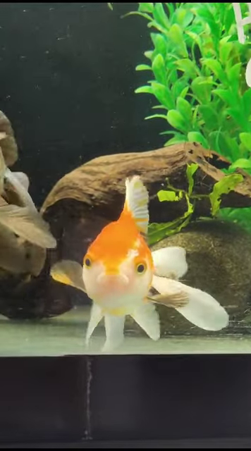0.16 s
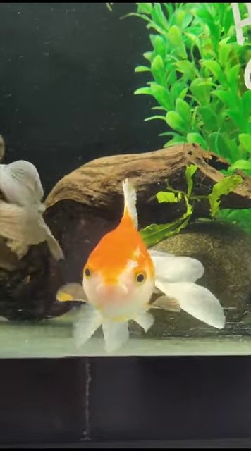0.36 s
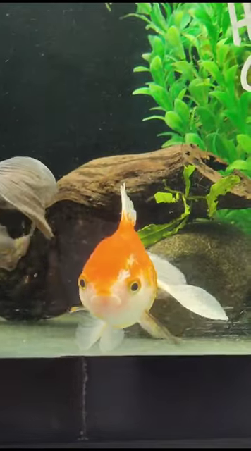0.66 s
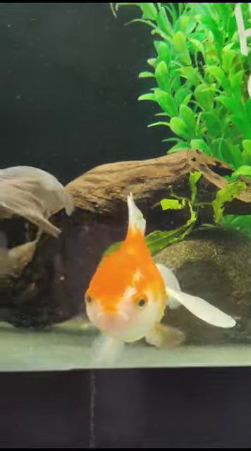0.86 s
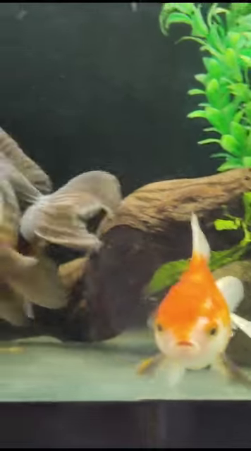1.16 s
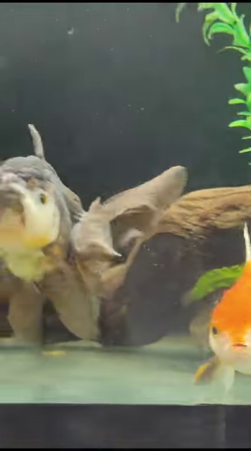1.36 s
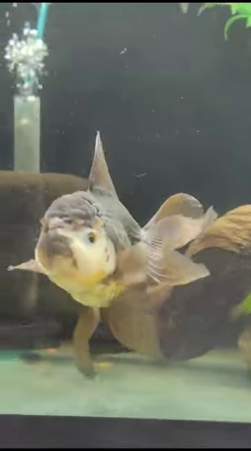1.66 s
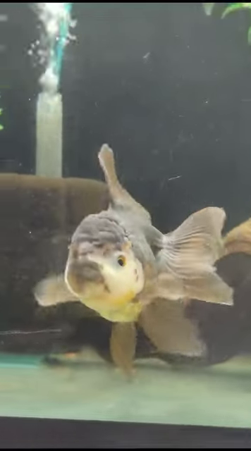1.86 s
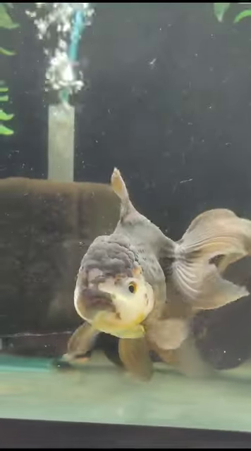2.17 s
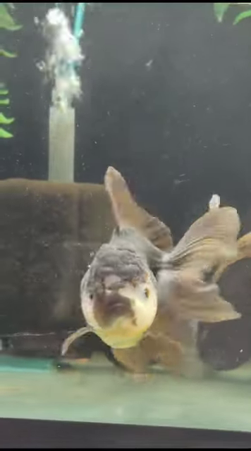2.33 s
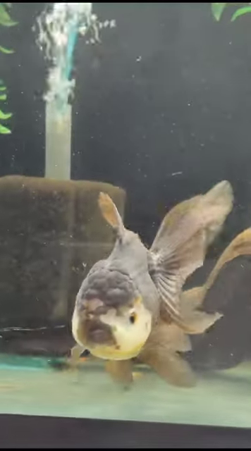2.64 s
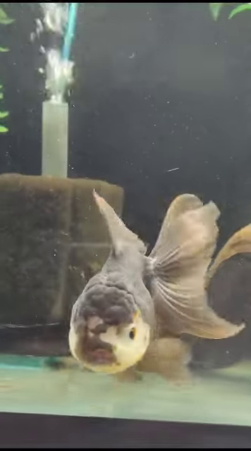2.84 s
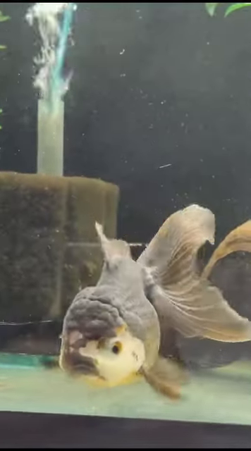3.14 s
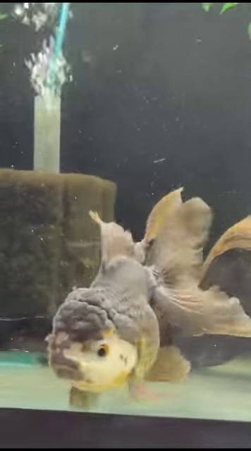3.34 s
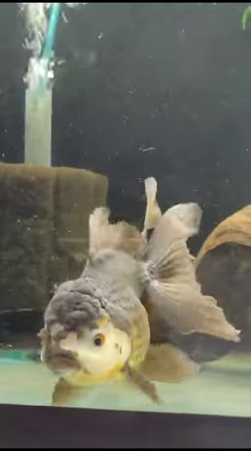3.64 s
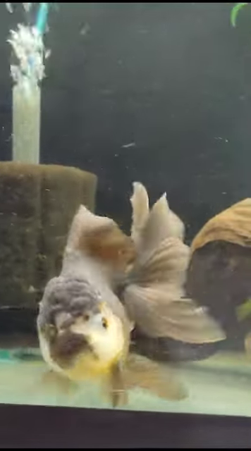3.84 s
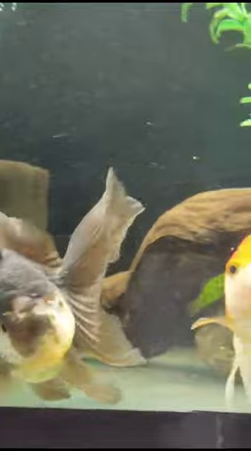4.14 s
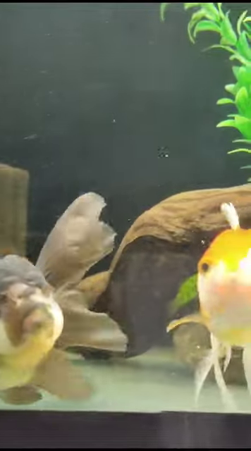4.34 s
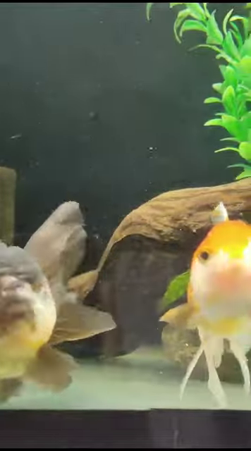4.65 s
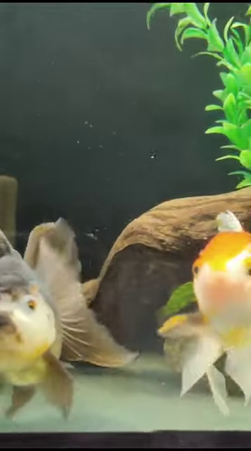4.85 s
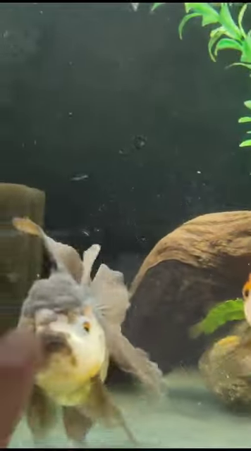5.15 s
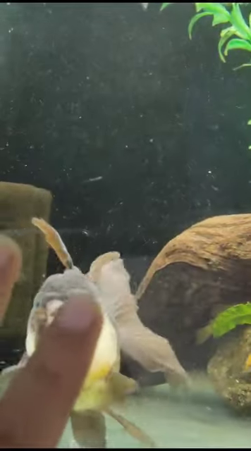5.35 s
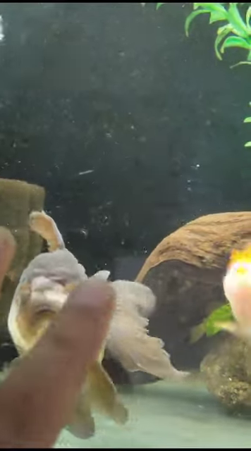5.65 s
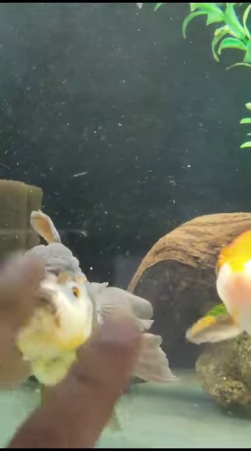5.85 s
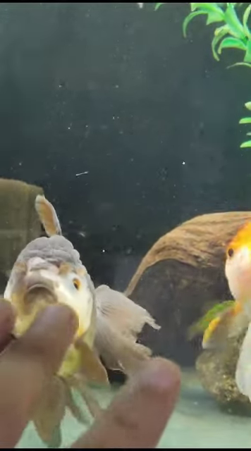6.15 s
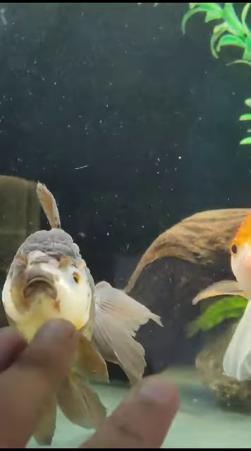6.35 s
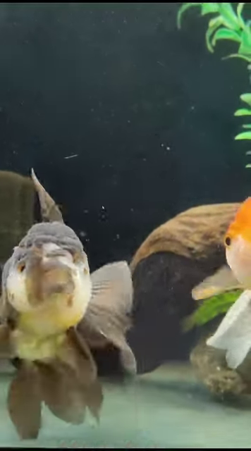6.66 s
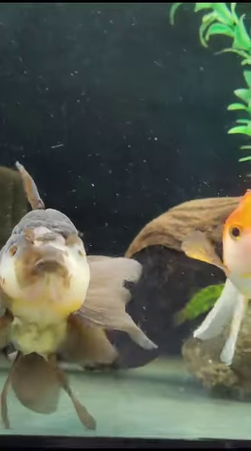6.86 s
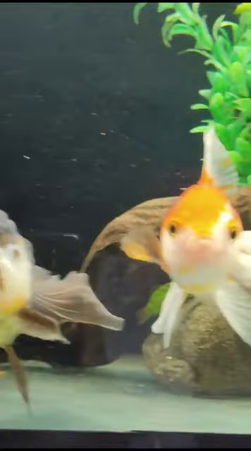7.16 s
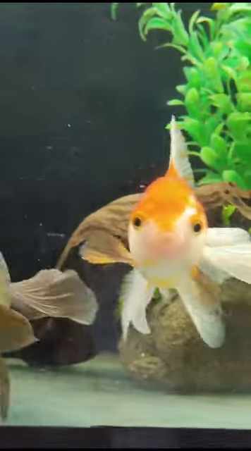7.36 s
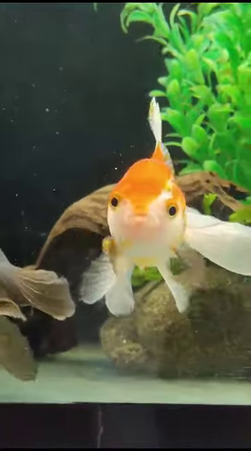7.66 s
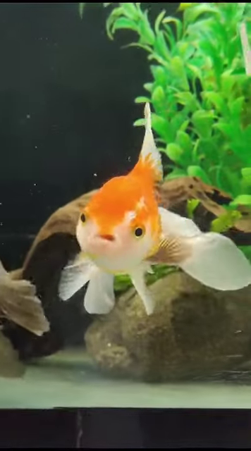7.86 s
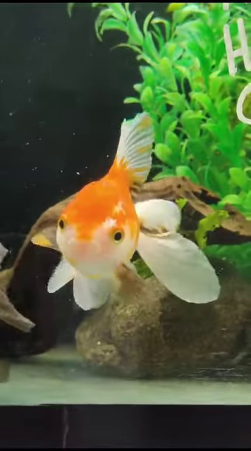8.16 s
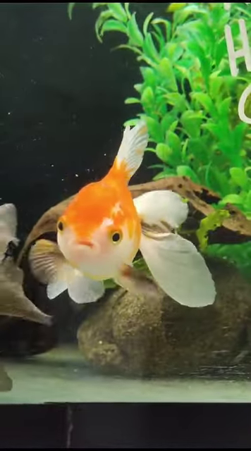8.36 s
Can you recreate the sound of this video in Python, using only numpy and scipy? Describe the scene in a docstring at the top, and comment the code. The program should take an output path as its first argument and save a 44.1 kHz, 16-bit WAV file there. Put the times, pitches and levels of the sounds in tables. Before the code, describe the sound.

An aquarium filter gurgles steadily with dense low bubbling over a soft watery rush and hum, while a thin motor whine fades and returns.

```python
"""A home aquarium in a small room, from a hand-held microphone drifting along the front glass.
Throughout, air gurgles from a sponge filter's lift tube (ringing bubbles) over a rush (shaped noise) and hum.
A motor whine (sines locked to one shaft) sinks into quiet zones of the room at about 1.5-2.9 s and 5.2-6.4 s.
Thin, high squeaks (gliding sines) come near 2.1 s and 3.7 s; the gurgle slackens near 3.55 s and 7.98 s.
Two faint ticks (noise bursts) come close to the end, after 8.4 s."""
import sys
import numpy as np
from scipy import signal
from scipy.fft import rfft, irfft
from scipy.io import wavfile
from scipy.ndimage import uniform_filter1d

SR = 44100
rng = np.random.default_rng(int(sys.argv[2]) if len(sys.argv) > 2 else 0)


def log_audio(samples):
    """Write samples as a 16-bit WAV file to the path given in sys.argv[1]."""
    # one column per channel
    frames = np.atleast_2d(samples).T
    # limit to full scale, then quantise
    limited = np.clip(frames, -1, 1)
    pcm = np.round(limited * 32767).astype(np.int16)
    wavfile.write(sys.argv[1], SR, pcm)


N = 374850  # length of the scene in samples


def amp(db):
    """Decibels to gain."""
    return 10 ** (np.asarray(db) / 20)


def unit(x):
    """Scales to rms 1."""
    return x / np.sqrt(np.mean(x ** 2) + 1e-20)


def curve(rows, t, axis=1):
    """One column of a time table, joined by straight lines, at the times t."""
    rows = np.asarray(rows)
    return np.interp(t, rows[:, 0], rows[:, axis])


def colour(points, hz):
    """A spectrum in dB, joined on a log-frequency axis."""
    f, db = np.transpose(points)
    return np.interp(np.log(hz + 1), np.log(f), db)


def drift(rate_hz):
    """Random wander of rms 1, its spectrum falling away smoothly around the given rate."""
    hz = np.fft.rfftfreq(N, 1 / SR)
    spectrum = rfft(rng.standard_normal(N)) * np.exp(-(hz / rate_hz) ** 2)
    return unit(irfft(spectrum, N))


def patches(shape, size):
    """A smooth random field of rms 1 over frames and frequency bins."""
    field = rng.standard_normal(shape)
    for axis in (0, 1, 0, 1):
        field = uniform_filter1d(field, size[axis], axis, mode="wrap")
    return unit(field)


def add(mix, start_s, sound):
    """Mixes a sound in at its start time."""
    part = mix[max(round(start_s * SR), 0):][:len(sound)]
    part += sound[:len(part)]


def room(x, t60, wet_db):
    """Direct sound plus a short tail of sparse reflections that falls 60 dB in t60 seconds."""
    t = np.arange(SR // 2) / SR
    signs = rng.choice([-1, 1], len(t))
    present = rng.random(len(t)) < 1 / 20
    taps = signs * present * (t > .004) * amp(-60 * t / t60)
    tail = signal.fftconvolve(x, taps / np.linalg.norm(taps))[:N]
    return x + amp(wet_db) * tail


def bubble(hz, cycles, rise):
    """A pocket of air rings, its pitch climbing as it nears the surface."""
    age = np.arange(SR // 6) / SR * hz / cycles  # in decay times, each lasting the given cycles
    turns = cycles * (age + rise * (age - 1 + np.exp(-age)))
    ring = np.sin(2 * np.pi * turns) * np.exp(-age) * (1 - np.exp(-age * cycles))
    return ring / abs(ring).max()


def births(per_s, spread_db):
    """Impulses at random moments, each with a random strength."""
    moments = rng.random(N) < per_s / SR
    return moments * amp(spread_db * np.minimum(rng.exponential(1, N), 2))


# Colour of the gurgle through the tank wall: (frequency [Hz], relative level [dB])
WALL_COLOUR = [(60, -43), (90, -25.5), (115, -13), (150, -9), (190, -2), (280, 8.5), (355, 7.5), (430, -4),
               (530, -9), (680, -18.5), (1000, -20.5), (1800, -49)]
# Deepest bubbles, faintest near 3.55 s, before trim and surges: (time [s], level [dB])
DEEP_LEVEL = [(0, -52), (0.35, -45), (0.48, -52), (0.68, -51), (0.8, -44.5), (2.4, -45.5), (3.4, -44),
              (3.47, -56), (3.55, -61), (3.61, -49), (3.68, -51), (3.85, -44.5), (4.4, -45.5), (5.3, -43.5),
              (6, -45), (6.6, -44.5), (7.3, -45.5), (8.3, -45.5), (8.5, -50)]
# Small bubbles, in the gurgle and at the surface, before trims and surges: (time [s], level [dB])
SMALL_LEVEL = [(0, -50), (0.65, -47), (1.2, -50.5), (1.6, -49), (3.4, -48.5), (4.4, -50.5), (4.8, -53.5),
               (5.3, -49.5), (7.1, -48), (7.6, -49), (7.9, -49), (8.5, -48.5)]
SURGE_HZ, SURGE_DB = 28, 2  # the air comes in uneven surges
DEEP_SURGE_DB, SMALL_SURGE_DB = 1.7, 1.5


def gurgle(t, per_s=900, cycles=2.81, rise=0.18, spread_db=2.5, level_db=-6.5, deep_db=0.0,
           small_db=-1.0, deep_hz=228, small_hz=430, count=48):
    """A dense crowd of bubbles of all sizes; the small ones come more rarely."""
    crowd = np.zeros(N)
    for hz in np.geomspace(110, 1000, count):
        starts = births(per_s / count * min(1, 350 / hz), spread_db)
        crowd += signal.oaconvolve(starts, bubble(hz, cycles * np.sqrt(hz / 250), rise))[:N]
    hz = np.fft.rfftfreq(N, 1 / SR)
    spectrum = rfft(room(crowd, t60=0.33, wet_db=-2.5))
    # evened out over pitch, then coloured by the tank wall
    spectrum /= np.sqrt(abs(uniform_filter1d(abs(spectrum) ** 2, size=250)) + 1e-6)
    spectrum *= amp(colour(WALL_COLOUR, hz)) / (1 + (hz / 2500) ** 4)
    # three bands for three bubble sizes, each with its own level
    deep = 1 / (1 + (hz / deep_hz) ** 10)
    small = 1 - 1 / (1 + (hz / small_hz) ** 10)
    middle = 1 - deep - small
    deep_level = curve(DEEP_LEVEL, t) + deep_db + DEEP_SURGE_DB * drift(SURGE_HZ)
    middle_level = airflow(t) + level_db
    small_level = curve(SMALL_LEVEL, t) + small_db + SMALL_SURGE_DB * drift(SURGE_HZ)
    sizes = [(deep, deep_level), (middle, middle_level), (small, small_level)]
    return sum(amp(db) * metered(irfft(spectrum * share, N)) for share, db in sizes)


# Middle-sized bubbles, a little weaker towards the end, before trim: (time [s], level [dB])
AIRFLOW_LEVEL = [(0, -37), (1.5, -40.5), (4.6, -38), (5.4, -38.5), (6.8, -39.5), (7.5, -43.5), (8.5, -41.5)]
# Brief slackenings of the flow: (time [s], half length [s], dip [dB])
FLOW_LULLS = [(3.553, 0.046, 13), (7.984, 0.07, 23)]


def airflow(t):
    """Strength of the middle-sized bubbles in dB: random surges, broken by lulls."""
    dips = sum(dip_db * np.exp(-((t - s) / half_length) ** 2) for s, half_length, dip_db in FLOW_LULLS)
    return curve(AIRFLOW_LEVEL, t) + SURGE_DB * drift(SURGE_HZ) - dips


def metered(x):
    """The pump meters out the air, so the bubbles' short-term power stays nearly even."""
    x = unit(x)
    return x / np.sqrt(abs(uniform_filter1d(x ** 2, size=5000)) + 0.039)


# Single bubbles leaving the tube, large and small, before trim and room:
# (time [s], peak [dB], starting pitch [Hz], swell time constant [s], pitch climb [octaves/s])
SINGLE_GULPS = [(0.033, -38, 393, 0.016, 17.5), (0.058, -49, 650, 0.015, 6), (0.082, -37, 357, 0.013, 15),
                (0.278, -27, 300, 0.012, 10.5), (0.288, -46.0, 730, 0.017, 14.5),
                (0.304, -36.0, 327.5, 0.036, 2), (0.381, -44, 358, 0.014, 17.5),
                (0.438, -47, 397, 0.017, 13.5), (0.47, -37.5, 330, 0.017, 2), (0.79, -37, 172, 0.019, 4),
                (0.795, -35, 332, 0.018, 4), (0.973, -46, 506, 0.036, 3.5), (1.003, -29, 328, 0.012, -5),
                (1.25, -46, 515, 0.016, 5.5), (1.336, -33.5, 285.6, 0.034, 5),
                (1.395, -29.5, 272, 0.0081, 9), (1.53, -31.5, 300, 0.013, 21),
                (1.569, -33.5, 278, 0.015, 11.5), (1.571, -43, 660, 0.015, 3.5),
                (1.572, -42.5, 589, 0.027, 0), (1.766, -45, 766, 0.01, -1), (1.782, -32.5, 298, 0.033, 8),
                (1.846, -42, 564, 0.013, 14), (1.908, -46, 756, 0.0083, 10),
                (2.207, -33.0, 345, 0.03, -0.5), (2.318, -36.5, 188, 0.018, 2),
                (2.332, -44, 358, 0.028, 10.5), (2.376, -37, 192, 0.02, -2), (2.485, -34, 340, 0.012, 4),
                (2.612, -33.5, 325, 0.018, 4.5), (2.7, -47.5, 550, 0.043, 4), (2.703, -33, 277, 0.041, 5),
                (2.803, -35.5, 277, 0.018, 1), (2.999, -39.0, 520, 0.015, 11.5),
                (3.109, -39, 268, 0.041, 5), (3.138, -37.5, 420, 0.018, 16), (3.172, -44, 630, 0.009, 8),
                (3.209, -32.5, 297, 0.013, 16), (3.261, -45, 349, 0.024, 7.5), (3.318, -46, 488, 0.013, 4),
                (3.406, -37, 312, 0.017, -0.5), (3.434, -42.5, 507, 0.02, 2),
                (3.507, -39.5, 362.6, 0.02, 6), (3.695, -34.5, 304, 0.02, 3), (3.746, -34, 345, 0.036, 0.5),
                (3.844, -34, 275, 0.029, -0.5), (3.99, -33.5, 240, 0.033, -0.5),
                (4.235, -36.5, 497, 0.016, 3), (4.293, -44.5, 383.5, 0.055, 6),
                (4.308, -42.5, 424, 0.018, 2.5), (4.49, -35, 254, 0.021, 4),
                (4.634, -32, 292.7, 0.029, 3.5), (5.07, -35.5, 293, 0.012, -1),
                (5.208, -35.5, 328, 0.024, 9.5), (5.243, -38, 177, 0.022, 1.5), (5.267, -40, 589, 0.009, 2),
                (5.289, -42.0, 444, 0.018, 18), (5.298, -34, 222.6, 0.047, -1), (5.306, -35, 339, 0.017, 6),
                (5.372, -33.5, 296, 0.024, 10), (5.403, -41, 484, 0.023, 3.5),
                (5.607, -29.5, 264, 0.0067, -3), (5.633, -47, 571, 0.03, 3), (5.67, -31.5, 291, 0.013, 3.5),
                (5.76, -34, 342, 0.017, 2.5), (5.854, -36, 428, 0.0078, 14), (6.009, -38, 523, 0.015, -0.5),
                (6.13, -32.5, 347, 0.011, 3), (6.283, -29.5, 206, 0.0064, 8), (6.305, -38, 485, 0.018, 7),
                (6.309, -44, 392, 0.027, 10.5), (6.32, -46, 573, 0.02, 6), (6.43, -41, 482, 0.03, -1),
                (6.545, -35.5, 355, 0.015, 0), (6.634, -30.5, 204, 0.0073, -1.5),
                (6.766, -32.5, 259, 0.027, 10.5), (6.926, -34, 283, 0.031, 0.5),
                (7.066, -42, 684, 0.009, 11), (7.092, -30.5, 210, 0.02, 5), (7.213, -46.0, 635, 0.017, 11),
                (7.367, -37.5, 413, 0.022, 15.5), (7.494, -45, 508, 0.033, 4),
                (7.733, -33, 321, 0.013, 4.5), (7.802, -38, 252, 0.021, 4), (7.824, -37.5, 377, 0.023, 4.5),
                (8.215, -40.5, 476, 0.022, 8), (8.226, -38, 608, 0.011, -2), (8.421, -43, 647, 0.02, 15.5)]


def gulps(level_db=-1.0):
    """Single bubbles, large and small, over the gurgle, with a little of the room."""
    out = np.zeros(N)
    for s, db, hz, swell_s, climb in SINGLE_GULPS:
        add(out, s, amp(db + level_db) * gliding_tone(hz, swell_s, climb))
    return room(out, t60=0.26, wet_db=-11)


def gliding_tone(hz, swell_s, octaves_per_s):
    """A sine swells and rings out while its pitch glides, as when a bubble pinches off."""
    t = np.arange(0, 5 * swell_s, 1 / SR)
    age = t / swell_s
    ring = age * np.exp(-age - (age / 2) ** 2)
    turns = np.cumsum(hz * 2 ** (octaves_per_s * t)) / SR
    return ring / ring.max() * np.sin(2 * np.pi * turns)


SHAFT_HZ, WHINE_ORDER = 58.162, 40  # shaft turns per second; whine as a multiple of them
# Whine at the microphone, through two quiet zones, before trim and flutter: (time [s], level [dB])
WHINE_LEVEL = [(0, -36), (1.18, -34.5), (1.42, -38), (1.52, -49), (2.05, -52), (2.82, -50), (2.96, -41),
               (3.1, -46), (3.27, -41.5), (4.25, -35), (4.66, -35), (5.02, -41.5), (5.26, -61.5),
               (5.62, -56), (5.76, -51), (6.1, -51), (6.23, -57), (6.4, -49.5), (6.98, -40), (7.22, -38),
               (7.45, -35), (8.5, -35)]
# Its octave, with standing waves of its own, before trim: (time [s], level [dB])
OCTAVE_LEVEL = [(0, -81), (1.45, -83), (1.62, -63), (1.8, -60), (2.7, -60), (2.88, -65.5), (3.6, -66.5),
                (3.92, -85), (4.12, -64.5), (4.4, -59), (4.73, -58.5), (4.85, -67.5), (5.75, -65.5),
                (6.35, -69), (6.85, -67), (7.2, -58), (7.8, -55), (8.5, -57)]
# Side tone one shaft order above the whine: (time [s], level [dB])
UPPER_SIDE_LEVEL = [(0, -55), (1.35, -63), (1.8, -79), (2.4, -69), (3.5, -58), (4.75, -60), (5.2, -72),
                    (5.4, -67), (6.1, -58.5), (6.75, -56), (7.3, -75.5), (7.65, -65.5), (8.5, -68)]
# Third harmonic of the whine: (time [s], level [dB])
TWELFTH_LEVEL = [(0, -64), (1.45, -67.5), (1.6, -82), (2.3, -78), (2.95, -67.5), (4.65, -67), (5.15, -82),
                 (5.7, -70), (6.8, -66.5), (7.4, -67.5), (8.5, -84)]
# Weaker motor orders, before their slow fades: (multiple of the shaft speed, level [dB])
MOTOR_ORDERS = [(1, -79), (4, -60), (42, -70), (62, -77.5), (121, -71), (123, -76)]


def motor(t, waver_hz=0.0076, whine_db=-0.27, octave_db=-0.5, flutter_db=0.67, fade_db=3.5, buzz_db=-68,
          echo_db=-69, octave_echo_db=-76, sway_hz=5, lower_db=-21):
    """Whine, side tones, overtones and weaker orders, all multiples of one slightly wavering shaft."""
    angle = 2 * np.pi * np.cumsum(SHAFT_HZ + waver_hz * drift(1.85)) / SR
    # weak echoes add or cancel as the hand sways, so the whine is least steady where it is faint
    strength = amp(curve(WHINE_LEVEL, t) + whine_db + flutter_db * drift(28))
    strength = strength + amp(echo_db) * drift(sway_hz)
    lower_side = amp(lower_db) * np.sin((WHINE_ORDER - 1) * angle)
    whine = strength * (np.sin(WHINE_ORDER * angle) + lower_side)
    whine += amp(curve(UPPER_SIDE_LEVEL, t)) * np.cos((WHINE_ORDER + 1) * angle)
    octave = amp(curve(OCTAVE_LEVEL, t) + octave_db) + amp(octave_echo_db) * drift(sway_hz)
    overtones = octave * np.sin(2 * WHINE_ORDER * angle)
    overtones += amp(curve(TWELFTH_LEVEL, t)) * np.sin(3 * WHINE_ORDER * angle)
    orders = sum(amp(db + fade_db * drift(0.094)) * np.sin(round(k) * angle) for k, db in MOTOR_ORDERS)
    # a faint comb of high orders gives the hiss a buzzing edge
    buzz = sum(rng.rayleigh() * np.sin(k * angle + 2 * np.pi * rng.random()) for k in range(82, 116))
    return np.sqrt(2) * (whine + overtones + orders) + amp(buzz_db) * unit(buzz)


# Small bubbles at the surface follow SMALL_LEVEL, listed above the gurgle.
def spatter(t, per_s=220, cycles=9, rise=0.031, spread_db=8.0, level_db=-7.0, count=24):
    """Small bubbles burst at the surface above the tube, as strongly as they arrive."""
    out = np.zeros(N)
    for hz in np.geomspace(620, 1700, count):
        starts = births(per_s / count, spread_db)
        out += signal.oaconvolve(starts, bubble(hz, cycles, rise) / np.sqrt(hz))[:N]
    return amp(curve(SMALL_LEVEL, t) + level_db) * unit(room(out, t60=0.071, wet_db=3.0))


# Thin, high squeaks, before trim and room:
# (time [s], peak [dB], starting pitch [Hz], swell time constant [s], pitch glide [octaves/s])
SQUEAKS = [(2.022, -56, 3150, 0.008, 6), (2.06, -51, 3220, 0.018, 1), (2.106, -52, 3290, 0.01, 3),
           (2.13, -55, 3270, 0.014, 2), (3.576, -51, 3590, 0.0092, -1.5), (3.598, -49.5, 3420, 0.018, 1.5),
           (3.638, -50, 3490, 0.01, 2), (3.73, -58, 3320, 0.018, 1), (3.83, -52.5, 3300, 0.0083, 0)]


def squeaks(level_db=0.3):
    """Thin, high squeaks: brief swelling sines with gliding pitch, near 2.1 s and 3.7 s."""
    out = np.zeros(N)
    for s, db, hz, swell_s, glide in SQUEAKS:
        add(out, s, amp(db + level_db) * gliding_tone(hz, swell_s, glide))
    return room(out, t60=0.12, wet_db=-12.5)


# Spectrum of the steady rush of air and water: (frequency [Hz], relative density [dB])
RUSH_COLOUR = [(25, -55.5), (42, -25), (80, -26), (130, -15), (400, -1), (750, -6), (1100, -9),
               (1700, -5.5), (2400, -0.5), (3200, -12), (3950, -16.5), (5100, -13.5), (6000, -8.5),
               (7900, -19)]
# Resonances and one hollow of the tank and its lid: (frequency [Hz], width [Hz], gain [dB])
TANK_RESONANCES = [(780, 65, 2), (926, 21, 10), (1053, 61, 6.5), (1233, 67, 10), (1320, 21, 6.5),
                   (1387, 49, 9), (1450, 31, 5.5), (1490, 42, 2), (2204, 31, 8), (2300, 150, -10),
                   (3180, 480, 1.5), (3300, 110, 3)]
# Spray's upper middle, low treble and treble:
# (time [s], presence gain [dB], edge gain [dB], fizz gain [dB])
SPRAY_BANDS = [(0, -2, 1.5, -1), (2.1, -4.5, 0.5, 2), (3.2, 0, 0.5, 0), (4.6, -1.5, -2.5, 1.5),
               (6, 0.5, 0, -0.5), (7.3, -0.5, -0.5, 2.5)]


def rush(t, level_db=-46, standing_db=2.5, flicker_db=1.3, presence_hz=2600, edge_hz=3450, fizz_hz=4700):
    """Fine spray and moving air: noise coloured by the tank and the room's standing waves."""
    hz = np.fft.rfftfreq(2048, 1 / SR)
    s = np.arange(N // 512 + 5)[:, None] * 512 / SR  # frame times
    shape = (len(s), len(hz))
    db = colour(RUSH_COLOUR, hz)
    db = db + sum(gain / (1 + (2 * (hz - f) / width) ** 2) for f, width, gain in TANK_RESONANCES)
    # each spray band is a bell over octaves
    for column, (centre_hz, spread) in enumerate([(presence_hz, 0.071), (edge_hz, 0.02), (fizz_hz, 0.069)], 1):
        bell = np.exp(-np.log2((hz + 1) / centre_hz) ** 2 / spread)
        db = db + curve(SPRAY_BANDS, s, axis=column) * bell
    db = db + standing_db * patches(shape, size=(35, 1)) + flicker_db * patches(shape, size=(6, 14))
    frames = (rng.standard_normal(shape) + 1j * rng.standard_normal(shape)) * amp(db)
    noise = signal.istft(frames.T, nperseg=2048, noverlap=1536)[1][:N]
    return amp(level_db) * unit(noise)


# Band weakened by the echo off the glass as the microphone moves: (time [s], frequency [Hz])
GLASS_NOTCH = [(0, 1710), (1.1, 1705), (2.3, 1860), (4.4, 1760), (5.1, 1260), (6, 1310), (6.45, 1480),
               (8.5, 585)]
NOTCH_DB = 3


def glass(x, width_hz=210):
    """The echo off the glass weakens one band, which slides as the microphone moves."""
    hz, s, z = signal.stft(x, SR, nperseg=1024)
    notch = np.exp(-((hz[:, None] - curve(GLASS_NOTCH, s)) / width_hz) ** 2)
    return signal.istft(z * amp(-NOTCH_DB * notch), SR)[1][:N]


# Pump hum and faint thin tones, before their slow fades: (frequency [Hz], level [dB])
HUM_TONES = [(120, -64.5), (720, -72), (780, -71.5), (960, -72), (1080, -70), (1576, -67.5), (2501, -78.5),
             (2584, -72), (2805, -77.5), (3203, -72), (3305, -73), (5866, -69)]


def hum(t, fade_db=2):
    """Tones of steady pitch, each swelling and fading a little as the microphone moves."""
    tones = sum(amp(db + fade_db * drift(0.7)) * np.sin(2 * np.pi * (hz * t + rng.random()))
                for hz, db in HUM_TONES)
    return np.sqrt(2) * tones


# Faint ticks, level before the fade at each end:
# (time [s], level [dB], centre frequency [Hz], width [Hz], length [s])
FAINT_TICKS = [(8.41, -49, 4300, 4170, 0.024), (8.437, -53, 4300, 3970, 0.027)]


def ticks():
    """Brief dry bursts of band-shaped noise in the treble."""
    out, f = np.zeros(N), np.fft.rfftfreq(SR, 1 / SR)
    for s, db, hz, width, length in FAINT_TICKS:
        band = np.exp(-2 * ((f - hz) / width) ** 2)
        burst = irfft(rfft(rng.standard_normal(SR)) * band)[:int(length * SR)]
        add(out, s, amp(db) * unit(burst) * signal.windows.tukey(len(burst), .5))
    return out


def scene():
    """All sources at the one microphone; the water and squeaks pass the glass echo."""
    t = np.arange(N) / SR
    at_glass = gurgle(t) + gulps() + spatter(t) + squeaks() + rush(t)
    return (glass(at_glass) + motor(t) + hum(t) + ticks())[None]


EDGE_HZ = 7950  # upper band limit


def record(dry):
    """The recorder's steep band limit, a long low-pass filter."""
    low_pass = signal.firwin(1023, EDGE_HZ, window=("kaiser", 9), fs=SR)
    return signal.oaconvolve(dry, low_pass[None], "same")


dry = scene()
out = record(dry)
log_audio(out)
```